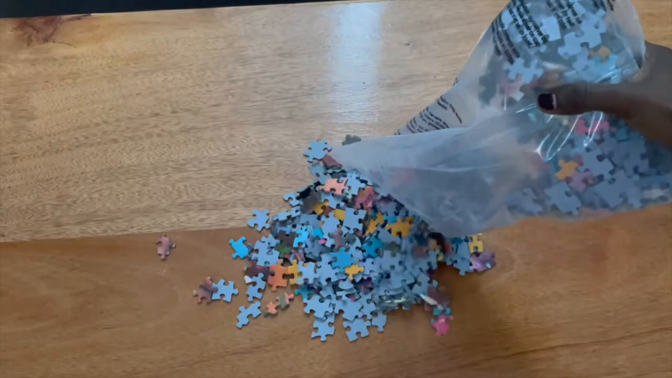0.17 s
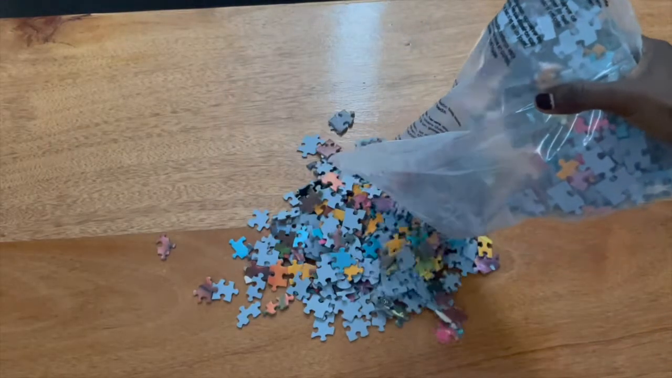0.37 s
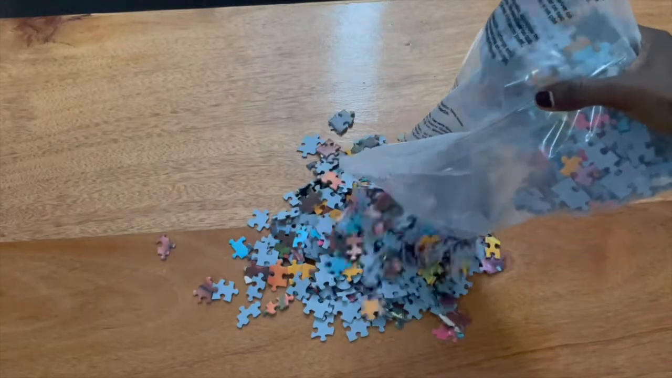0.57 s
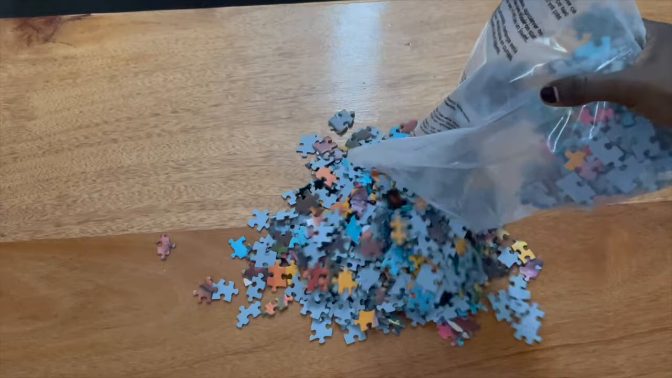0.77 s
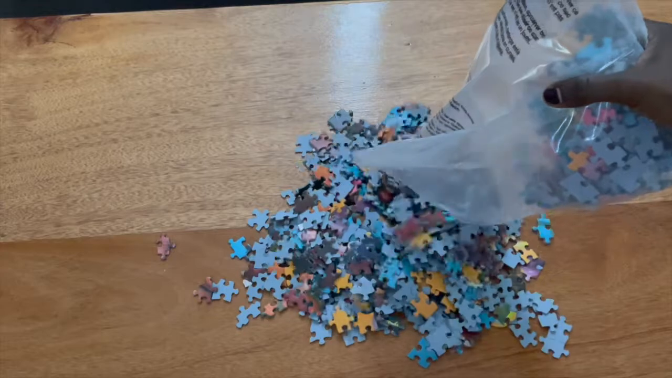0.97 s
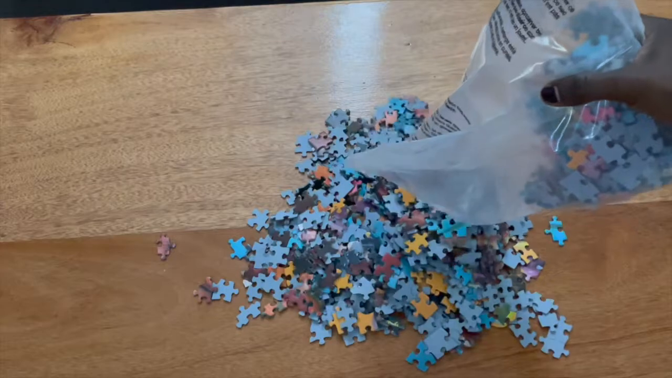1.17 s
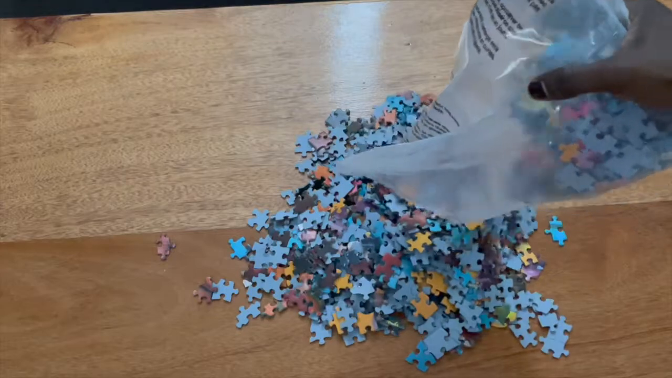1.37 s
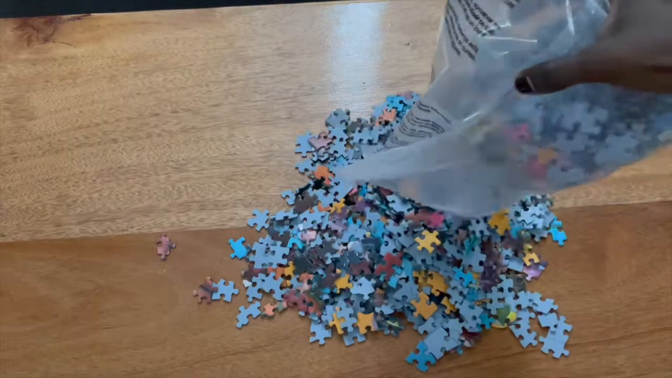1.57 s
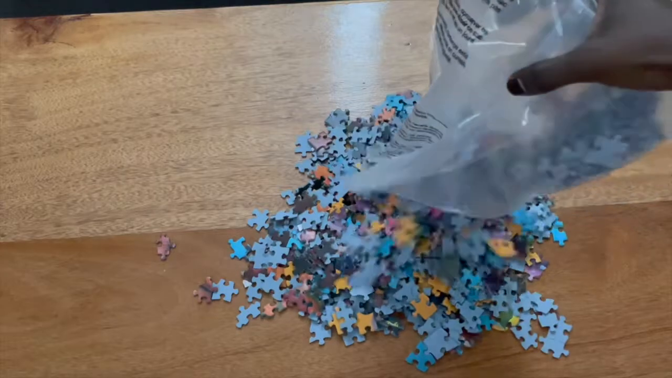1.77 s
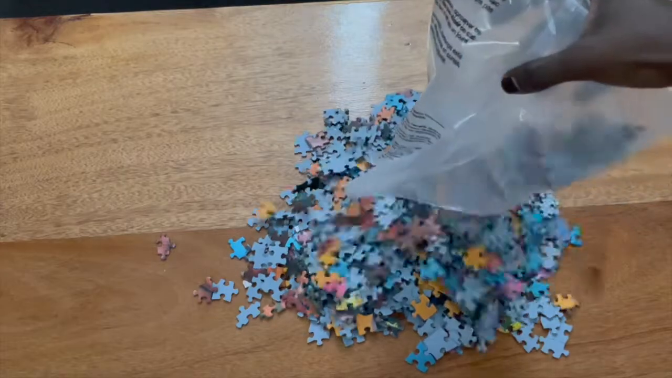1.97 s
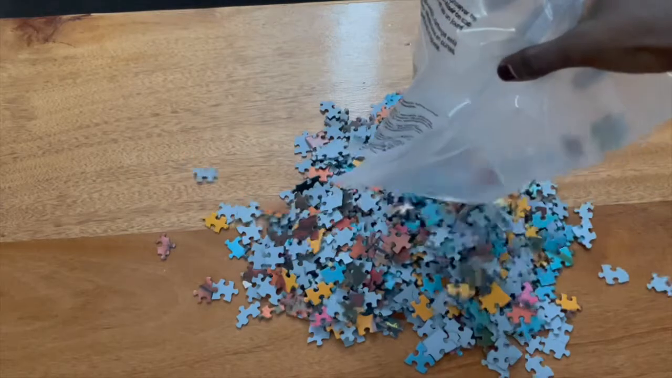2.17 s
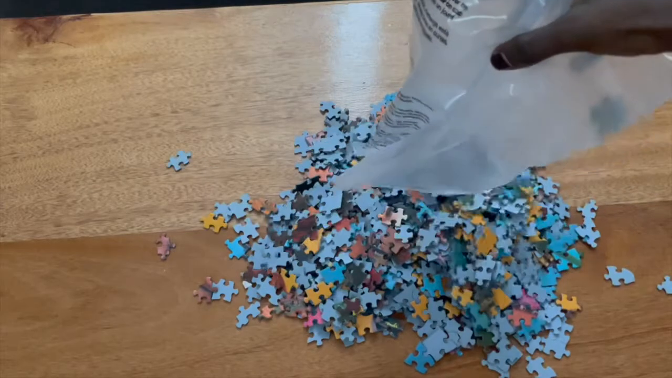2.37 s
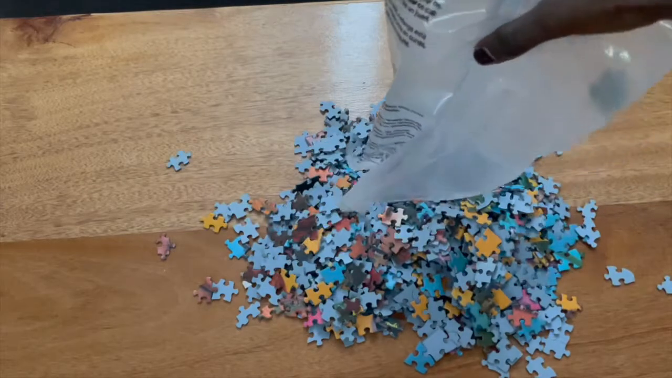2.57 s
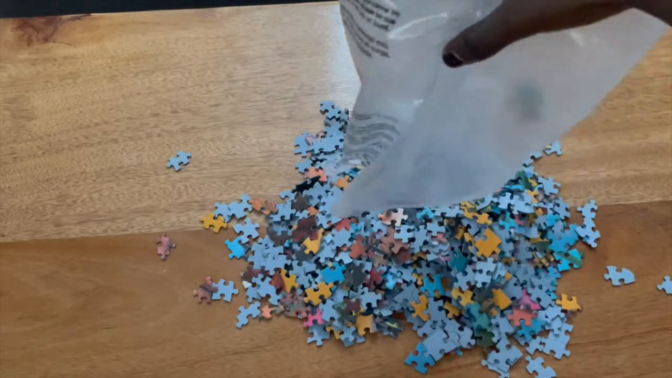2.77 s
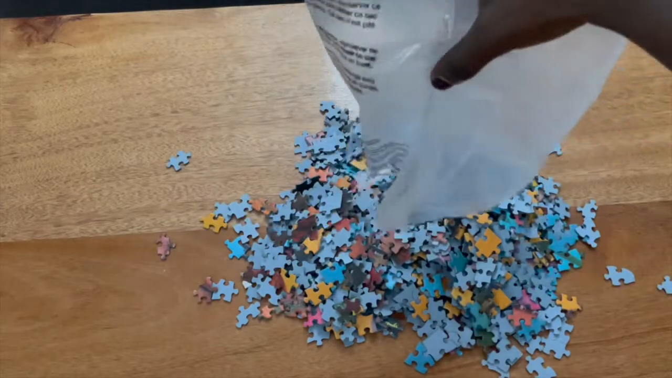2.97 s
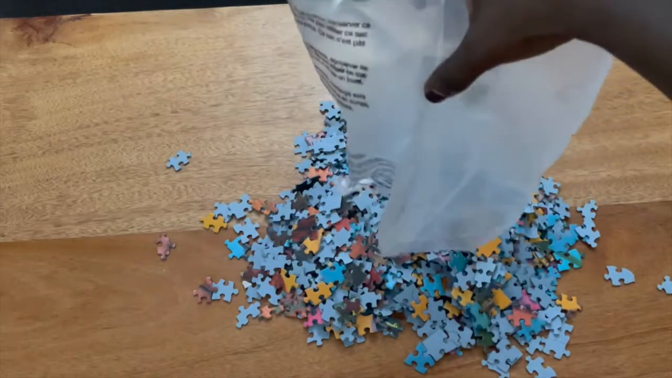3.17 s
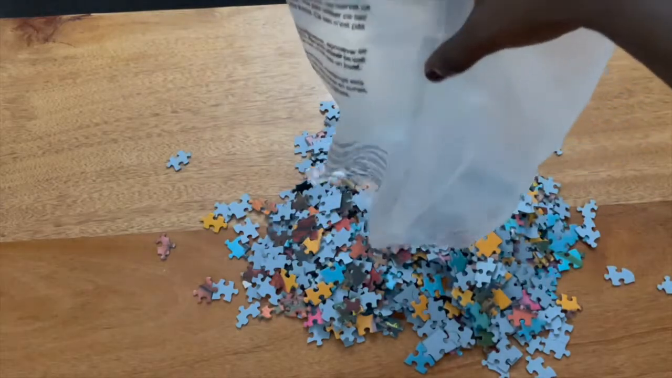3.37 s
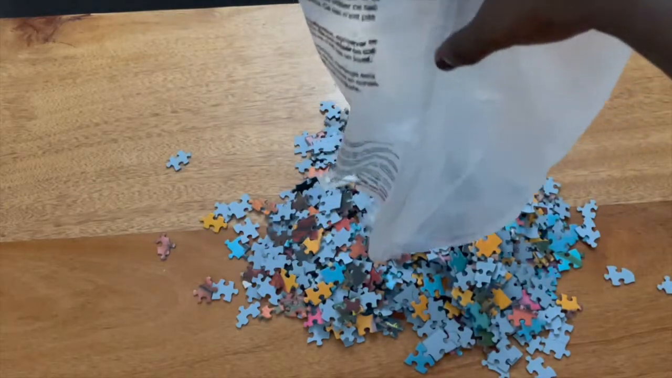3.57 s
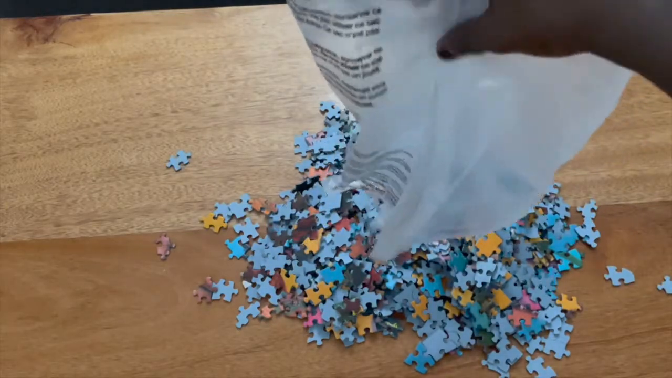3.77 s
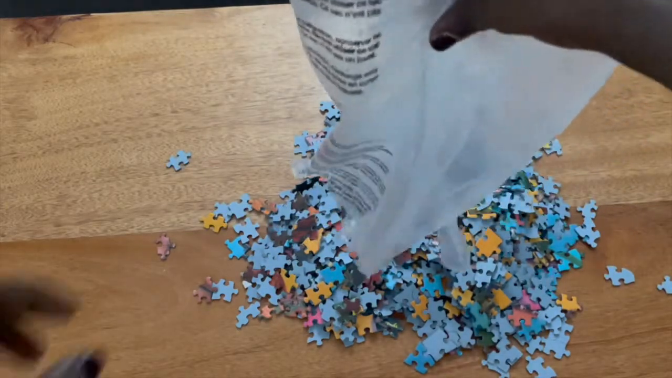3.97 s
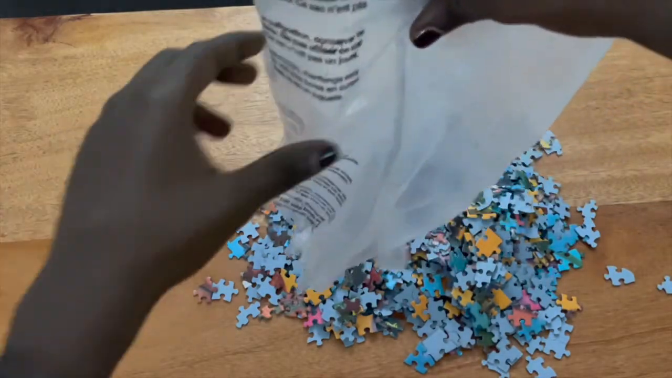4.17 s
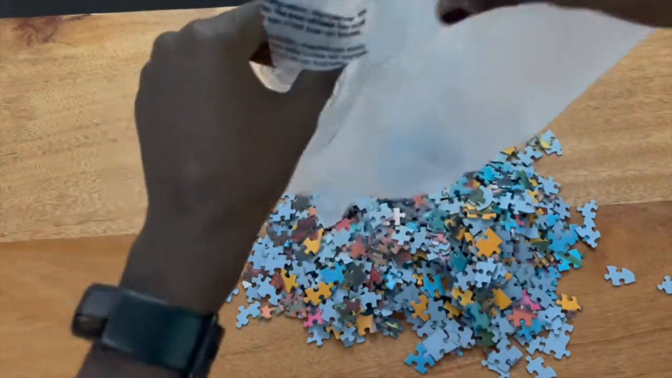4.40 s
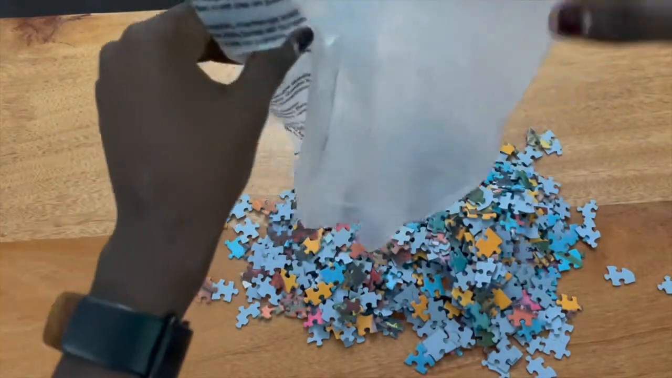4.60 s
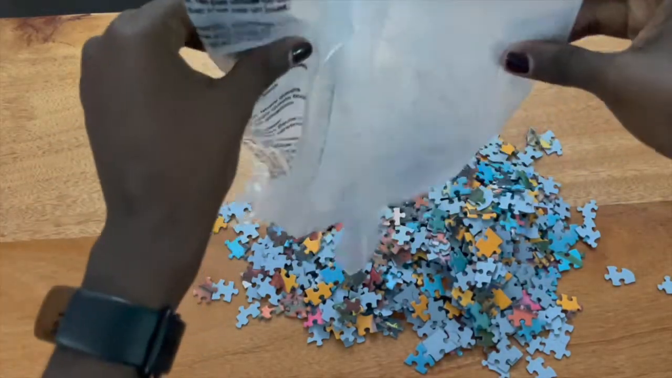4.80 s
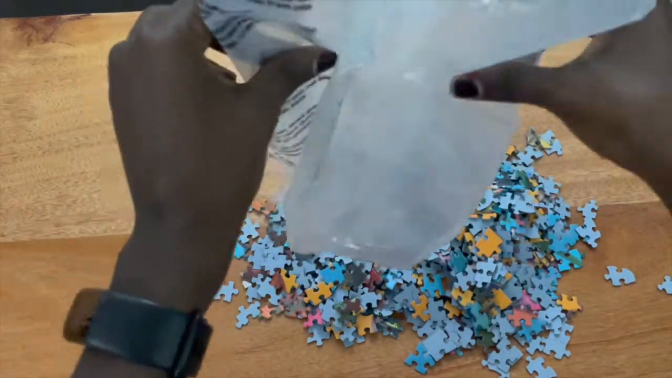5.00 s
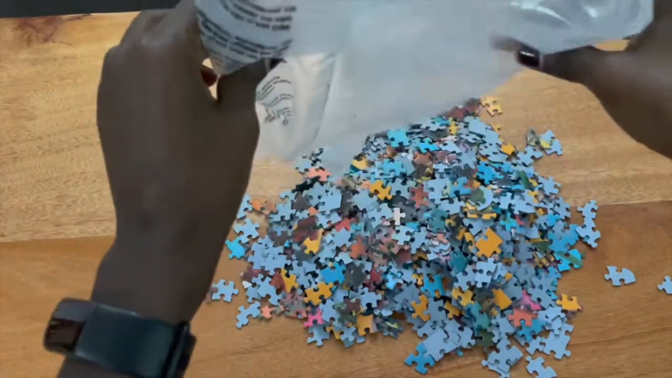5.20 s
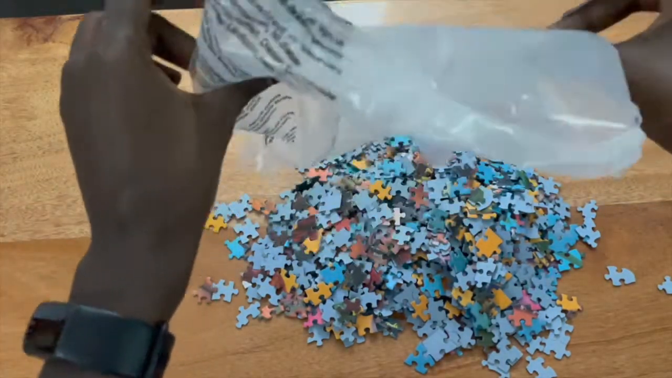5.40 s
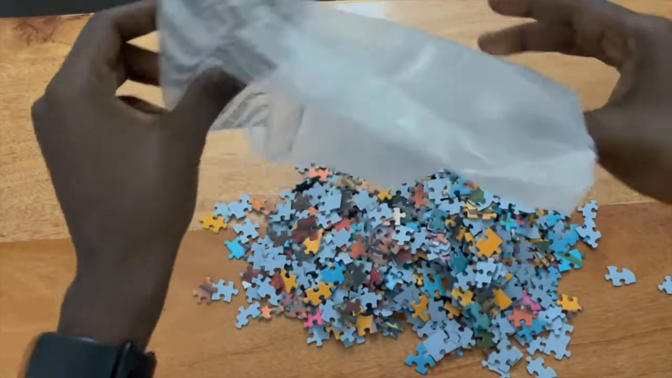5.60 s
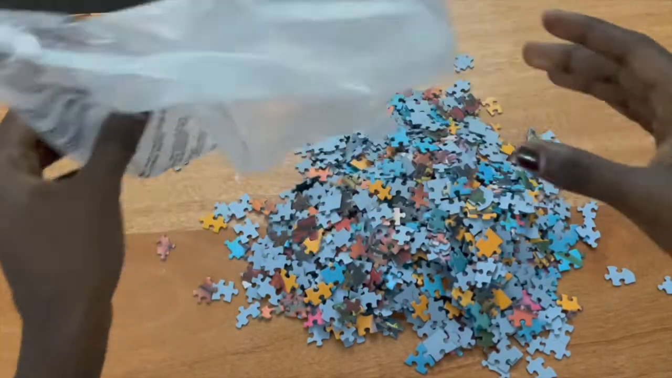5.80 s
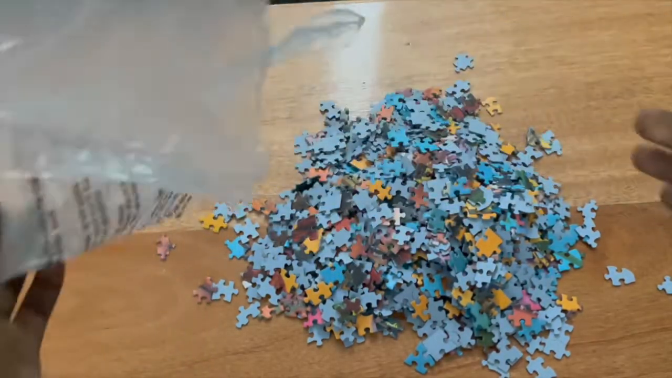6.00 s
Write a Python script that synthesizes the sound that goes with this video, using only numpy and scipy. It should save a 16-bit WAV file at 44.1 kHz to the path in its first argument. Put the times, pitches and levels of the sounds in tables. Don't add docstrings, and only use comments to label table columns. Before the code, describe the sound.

Cardboard puzzle pieces rush from a plastic bag in two clattering waves onto a wooden table, then the empty bag crinkles and snaps.

```python
import sys
import numpy as np
from scipy import signal
from scipy.fft import rfft, irfft, next_fast_len
from scipy.io import wavfile
from scipy.ndimage import uniform_filter1d, minimum_filter1d

SR = 44100
rng = np.random.default_rng(int(sys.argv[2]) if len(sys.argv) > 2 else 0)


def to_linear_factor(level_db):
    exponent = np.asarray(level_db, float) / 20
    return 10 ** exponent


def generate_wav(sig):
    pcm = np.round(np.clip(np.atleast_2d(sig).T, -1, 1) * 32767).astype(np.int16)
    wavfile.write(sys.argv[1], SR, pcm)


N = 266793
TIME = np.arange(N) / SR


def rms_one(x):
    return x / np.sqrt(np.mean(x ** 2) + 1e-20)


def at_hz(points, hz):
    f, level = np.transpose(points)
    return np.interp(np.log(np.maximum(hz, 1)), np.log(f), level)


def drift(rate):
    r = np.exp(-80 * np.pi * rate / SR)
    noise = rng.standard_normal(N // 40 + 2002)
    slow = signal.lfilter([1], [1, -2 * r, r * r], noise)[2000:]
    return np.interp(np.arange(N) / 40, np.arange(len(slow)), rms_one(slow))


def resonance(x, hz, width_hz):
    r = np.exp(-np.pi * width_hz / SR)
    zeros = np.array([1, 0, -1]) * (1 - r * r) / 2
    poles = [1, -2 * r * np.cos(2 * np.pi * hz / SR), r * r]
    return signal.lfilter(zeros, poles, x + 1e-18)


def band(x, low_hz, high_hz):
    return signal.sosfilt(signal.butter(2, [low_hz, high_hz], "band", fs=SR, output="sos"), x)


def pouring():
    # t/s, level/dB, weight reaching the bare wood/dB
    first_rush = [
        (0.0, -37.5, -0.5),
        (0.18, -43, 1),
        (0.4, -39, 1),
        (0.6, -32.5, 1.5),
        (0.74, -35, 3.5),
        (0.86, -30, -0.5),
        (1.04, -38.5, -1.5),
        (1.12, -45, 0),
        (1.23, -51.5, 0),
    ]
    second_rush = [
        (1.36, -43, 2.5),
        (1.61, -32.5, 1),
        (1.66, -27.5, -0.5),
        (1.95, -30.5, -1.5),
        (2.2, -33.5, -3),
        (2.42, -48.5, -1.5),
        (2.8, -52, 2.5),
        (3.4, -50.5, 4),
        (3.66, -67.5, 3.5),
    ]
    t, flow_db, weight_db = np.transpose(first_rush + second_rush)
    return np.interp(TIME, t, flow_db), np.interp(TIME, t, weight_db)


def movement():
    # peak t/s, rustle level/dB, hold/s, taut film's hiss re rustle/dB
    grips = [(3.786, -41, 0.1, -31.5), (4.196, -49, 0.021, 2), (4.306, -34, 0.0065, -30),
             (4.416, -49.5, 0.062, -5), (4.46, -52, 0.022, 0), (4.68, -54, .02, 9),
             (4.746, -36, 0.12, -6.5), (4.863, -34.5, 0.035, -10.5), (5.029, -32.5, 0.077, -1),
             (5.29, -33, 0.11, -7.5), (5.445, -43, 0.042, -12), (5.573, -44, 0.03, -29),
             (5.74, -54.5, 0.044, -26), (5.913, -64, 0.068, -24)]
    rise_db_per_s, fall_db_per_s = 208, 111
    flow_db, weight_db = pouring()
    rustle = to_linear_factor(2 * flow_db)
    hiss = to_linear_factor(2 * (-38 + 1.66 * (flow_db + 36)))
    for s, level_db, hold_s, taut_db in grips:
        rise = rise_db_per_s * np.maximum(s - TIME, 0)
        fall = fall_db_per_s * np.maximum(TIME - s - hold_s, 0)
        power = to_linear_factor(2 * (level_db - rise - fall))
        rustle = rustle + power
        hiss = hiss + power * to_linear_factor(2 * taut_db)
    return 10 * np.log10(rustle), 10 * np.log10(hiss), weight_db


def rumble():
    # f/Hz, width/Hz, level/dB
    modes = [(44.4, 34, -4), (69.2, 10.2, 4.5), (104.4, 43, -2.5)]
    rest_db, stirred_db = -42, -47
    white = rng.standard_normal(N + SR)
    low = 0
    for k, (hz, width_hz, db) in enumerate(modes):
        low = low + to_linear_factor(db) * rms_one(resonance(white, hz, width_hz)) * (-1) ** k
    low = band(low, 30, 160)[SR:]
    stirred = to_linear_factor(stirred_db + movement()[0] + 30)
    return (to_linear_factor(rest_db) + stirred) * rms_one(low)


def still_air():
    return to_linear_factor(-87.5) * band(rng.standard_normal(N), 200, 5400)


def thump():
    # t/s, f/Hz, peak level/dB, T60/s
    blows = [
        (2.93, 100.6, -37, 1),
        (3.098, 47, -36, 0.77),
        (4.735, 86, -22.5, 0.22),
    ]
    out = np.zeros(N)
    for s, hz, peak_db, t60 in blows:
        t = np.maximum(TIME - s, 0)
        out += to_linear_factor(peak_db - 60 * t / t60) * np.minimum(t / 0.0083, 1) * np.sin(2 * np.pi * hz * t)
    return out


def squeak():
    start, end, hz, width_hz = 3.545, 3.66, 3870, 150
    shape = np.interp(TIME, [start, start + .004, start + .02, end], [0, 1, .3, .15], right=0)
    whistle = resonance(resonance(rng.standard_normal(N), hz, width_hz), hz, width_hz)
    return to_linear_factor(-57) * shape * rms_one(whistle)


def foil():
    start, end, low_hz, high_hz = 2.68, 2.9, 8000, 11200
    ticks = rng.standard_normal(N) * (rng.random(N) < 500 / SR)
    shape = np.interp(TIME, [start, start + .005, end], [0, 1, .3], right=0)
    return to_linear_factor(-48) * shape * rms_one(band(band(ticks, low_hz, high_hz), low_hz, high_hz))


def crumples():
    # middle t/s, rms level/dB, f/Hz, half length/ms
    swells = [(0.737, -28, 2320, 42), (0.787, -22.5, 10000, 3.7), (1.702, -28, 3950, 26),
              (2.564, -67, 1500, 16), (2.94, -34, 3000, 1.8), (3.673, -19, 1790, 0.24),
              (4.792, -23.5, 3980, 2.4), (4.839, -23, 2480, 6.9), (4.929, -16.5, 4400, 1.8),
              (4.951, -23, 6000, 2.3), (4.959, -24.5, 1480, 5.1), (5.163, -28, 2000, 14),
              (5.335, -21.5, 2700, 8.7), (5.355, -20, 3500, 1.8), (5.382, -22.5, 3020, 1.4),
              (5.905, -49.5, 5950, 1.8), (1.158, -36.5, 6900, 1.3), (3.675, -32, 800, 1.8)]
    out, t = np.zeros(N), np.arange(-2048, 2048) / SR
    slips = rng.standard_normal((len(swells), 4096)) ** 3
    for (s, level_db, hz, ms), slip in zip(swells, slips):
        coloured = rms_one(resonance(slip, hz, hz / 0.59)) + 0.32 * rms_one(band(slip, 500, 5700))
        at = round(s * SR)
        out[at - 2048:at + 2048] += to_linear_factor(level_db) * coloured * np.exp(-(1000 * t / ms) ** 2)
    return out


def snaps():
    # t/s, peak level/dB, ring f/Hz, burst length/ms
    dull_landings = [(0.288, -41, 726, 2.4), (0.716, -13, 3720, 5.6), (1.025, -18.5, 1140, 4.7),
                     (0.665, -46, 1270, 4.6), (1.418, -27, 824, 3.5), (1.741, -11.5, 1300, 4),
                     (1.888, -5, 4370, 0.94), (1.967, -12, 6000, 1.5), (1.988, -14.5, 3730, 5.6),
                     (2.169, -15, 3330, 4.3), (2.269, -7, 4970, 1.4), (2.302, -12.5, 3970, 1.4)]
    last_pieces = [(2.41, -30.5, 1240, 3.2), (2.442, -25, 3780, 3.8), (2.491, -29.5, 960, 2.7),
                   (2.534, -32, 2030, 2.4), (2.57, -24.5, 1140, 3.9), (2.616, -31.5, 1870, 4.3),
                   (2.634, -39, 2500, 3), (2.952, -15, 2100, 1.1), (3.007, -30, 760, 2.6),
                   (3.055, -33, 1150, 4.6), (3.066, -27.5, 705, 2.8), (3.109, -18, 1130, 3.1),
                   (3.139, -31, 820, 2.1), (3.206, -17.5, 1240, 4.5), (3.433, -21.5, 1083, 2.1)]
    thick_folds = [(3.67, -12, 790, 1.6), (3.749, -27, 1050, 2.4), (3.78, -7.5, 2200, 1.9),
                   (3.804, -0.5, 3800, 1.4), (3.903, -24.5, 3470, 2.3), (4.138, -33.5, 1060, 2.9),
                   (4.279, -17, 2130, 1.9), (4.408, -10.5, 4970, 2), (4.693, -14, 1060, 5),
                   (4.835, -11.5, 1050, 4.7), (4.975, -5, 4350, 1.6), (5.231, -20, 1130, 4.8),
                   (5.277, -24, 1950, 2.6), (5.294, -12.5, 3840, 2.4), (5.335, -13.5, 860, 5.3),
                   (5.387, -3.5, 3240, 2.7), (5.414, -9.5, 4550, 1.8), (5.714, -19, 1830, 1.95)]
    emptying_snaps = [(0.308, -23.5, 900, 10), (0.349, -35, 3010, 2.3), (0.834, -11.5, 3800, 6.2),
                      (1.005, -17, 5640, 2), (1.341, -25, 1990, 1.9), (1.468, -19, 1100, 5.2),
                      (1.514, -14, 4460, 4.1), (1.575, -19, 1170, 0.65), (1.629, -18, 1470, 5.7),
                      (1.65, -3, 7540, 1.3), (0.375, -39, 5500, 1.3), (0.902, -14.5, 5000, 3.5),
                      (1.058, -23, 4400, 1.3), (2.057, -11, 5500, 2), (2.07, -9, 8500, 1.4),
                      (2.325, -20, 5500, 2.7), (2.365, -13, 3880, 1.77), (2.683, -27, 2200, 2.5),
                      (2.752, -31.5, 1170, 7.1), (2.985, -18.5, 3900, 3.6), (3.249, -18.5, 3860, 2.6),
                      (3.312, -23.5, 980, 4.4), (3.33, -18, 3680, 5), (3.379, -29, 1310, 5.1)]
    hand_snaps = [(4.162, -29, 1130, 11), (4.179, -19, 1270, 2.6), (4.224, -7.5, 2000, 2.8),
                  (3.739, -30, 5800, 1.3), (4.292, -11.5, 8800, 2.7), (4.562, -26, 5000, 1.2),
                  (4.664, -30, 1600, 4.8), (4.736, -5.5, 2490, 3.3), (4.796, -6.5, 5870, 1.3),
                  (4.811, -6, 1630, 4.4), (4.93, -12.5, 2100, 3.7), (4.934, 1.5, 5230, 1.8),
                  (5.055, -15, 3770, 2.2), (5.364, -13, 1700, 3.9), (5.583, -17, 2930, 3.6),
                  (5.959, -41.5, 810, 3.6)]
    soft_slaps = [(0.419, -23, 1290, 3.1), (1.241, -29.5, 1340, 3.9), (2.552, -24.5, 1510, 8.4),
                  (2.774, -30.5, 493, 4.5), (2.901, -34, 996, 4.4), (2.926, -28, 890, 4.2),
                  (3.485, -37, 1050, 7.2), (3.69, -29, 196, 23), (3.766, -24.5, 1500, 9.4),
                  (3.855, -28, 716, 7.7), (4.308, -6.5, 3340, 2.95), (4.311, -24.5, 201, 12.6),
                  (5.159, -18, 1550, 8.8), (5.498, -21.5, 1760, 2.7), (5.527, -25, 1390, 2.1),
                  (5.659, -32, 900, 4.8)]
    kinds = [dull_landings, last_pieces, thick_folds, emptying_snaps, hand_snaps, soft_slaps]
    # low push level/dB, bright edge level/dB
    kind_edges = [
        (-21.5, -31),
        (-15, -40),
        (-20, -20.5),
        (-21.5, 3),
        (-14, -3),
        (-7, -35),
    ]
    push_loss = 0.17
    spike = 0.75
    rows = [row + edge for kind, edge in zip(kinds, kind_edges) for row in kind]
    slips = rng.standard_normal((len(rows), 2048))
    slips = slips * np.abs(slips)
    heard, radiated = np.zeros((2, N + 2048))
    t = np.arange(2048) / SR
    for (s, peak_db, hz, ms, low_db, bright_db), slip in zip(rows, slips):
        low_db = low_db - push_loss * (peak_db + 22.5)
        length = np.clip(ms, .3, 12) / 1000
        burst = slip * np.minimum(t / (0.52 * length), 1) * np.exp(-t / length)
        burst[round(.52 * length * SR)] += spike * np.abs(burst).max()
        parts = [resonance(burst, hz, hz / 4), band(burst, hz / 3.4, min(2.8 * hz, 7800)),
                 band(burst, 296, 1800), band(burst, 3900, 13500)]
        ring, crack, low, bright = [p / np.abs(p).max() for p in parts]
        total = ring + 1.104 * crack + to_linear_factor(low_db + 9) * low + to_linear_factor(bright_db - 0.5) * bright
        at = round(s * SR)
        heard[at:at + 2048] += to_linear_factor(peak_db - 7) * total
        broad = band(burst, 520, 5600)
        radiated[at:at + 2048] += to_linear_factor(peak_db) * broad / np.abs(broad).max()
    return heard[:N], radiated[:N]


def contacts(rows, level_db, cycles, table_db):
    # f/Hz, level/dB, T60/s
    table_modes = [(1170, -8, 0.025), (3750, -5, 0.023), (5070, -5.5, 0.016)]
    out, t = np.zeros(N + 2048), np.arange(2048) / SR
    table_ring = sum(to_linear_factor(db + table_db - 60 * t / t60) * np.sin(2 * np.pi * hz * t) for hz, db, t60 in table_modes)
    click = 0.96 * np.exp(-t / .0004) * np.cos(2 * np.pi * 6500 * t)
    onset = np.minimum(t / 0.0009, 1)
    for s, peak_db, hz in rows:
        own = to_linear_factor(-60 * t * hz / cycles) * np.sin(2 * np.pi * hz * t)
        out[round(s * SR):][:2048] += to_linear_factor(peak_db + level_db) * onset * (own + table_ring + click)
    return out[:N]


def glints():
    # t/s, peak level/dB, ring f/Hz
    film_glints = [(0.0844, -36, 10600), (0.0922, -22, 10000), (0.1074, -34, 10600), (0.2244, -38, 9110),
                   (0.3082, -32, 10600), (0.3805, -32, 9140), (0.5516, -30, 10400), (0.6265, -26, 9370),
                   (0.6644, -30, 10200), (0.6794, -32, 8450), (1.5733, -24, 9510), (1.7724, -19, 9870),
                   (1.8033, -20, 9420), (1.9684, -18, 9730), (1.9889, -17, 11400), (2.0094, -18, 9220),
                   (2.1494, -24, 10300), (2.171, -25, 9450), (2.1894, -27, 10800), (3.2044, -45, 11000),
                   (4.9494, -17, 10300), (4.9746, -23, 9670), (5.0549, -13, 8900), (5.3363, -20, 9390),
                   (5.4126, -30, 10200)]
    return contacts(film_glints, -1, cycles=40, table_db=-20)


def flicks():
    # t/s, peak level/dB, ring f/Hz
    crease_flicks = [(2.424, -31, 3770), (2.477, -33, 2050), (2.563, -22, 1110), (2.704, -38, 2920),
                     (2.734, -36, 1020), (2.764, -28, 756), (2.789, -36, 1170), (2.819, -36, 1010),
                     (2.864, -40, 1010), (2.937, -21, 1720), (3.021, -36, 789), (3.044, -30, 1090),
                     (3.084, -29, 1530), (3.156, -36, 703), (3.184, -23.5, 1190), (3.224, -37, 1000),
                     (3.342, -22, 3900), (3.401, -32, 848), (3.529, -30, 3850), (3.814, -19, 915),
                     (3.824, -26.5, 2620), (3.911, -31, 1020), (4.244, -32, 2920), (4.329, -26, 937),
                     (4.359, -22, 1950), (4.466, -28, 3420), (4.499, -33, 1160), (4.701, -17.5, 890),
                     (4.714, -16, 1210), (4.744, -16, 3370), (4.827, -12, 2020), (4.849, -18, 1760),
                     (4.859, -13, 1910), (4.876, -18, 1110), (4.944, -13, 2320), (4.989, -21, 947),
                     (5.021, -24, 3650), (5.044, -21, 1110), (5.07, -22, 1230), (5.089, -16.5, 840),
                     (5.109, -21, 5190), (5.16, -19, 1780), (5.171, -18, 820), (5.259, -17, 3160),
                     (5.324, -12, 1190), (5.344, -14, 3950), (5.429, -22.5, 3750), (5.444, -26, 1120),
                     (5.463, -24, 837), (5.554, -31, 853), (5.6, -19, 2870), (5.619, -35, 2890),
                     (5.679, -34, 2270), (5.744, -37, 1210), (5.809, -45, 1230), (5.904, -33, 3080)]
    return contacts(crease_flicks, -4.5, cycles=19.4, table_db=-7)


def clacks():
    # t/s, peak level/dB, ring f/Hz
    piece_clacks = [(0.108, -26, 1200), (0.144, -21, 3000), (0.242, -30, 1140), (0.26, -34, 914),
                    (0.399, -22, 1350), (0.455, -18, 1380), (0.494, -15, 1660), (0.532, -17.5, 1320),
                    (0.549, -21, 1280), (0.599, -15, 2900), (0.63, -23, 3040), (0.665, -23, 1290),
                    (0.73, -14, 1290), (0.744, -17, 2430), (0.771, -16, 3570), (0.798, -18, 923),
                    (0.844, -15, 1360), (0.859, -17, 4770), (0.887, -20, 1310), (0.929, -18, 3860),
                    (0.944, -16, 3880), (1.044, -25, 1780), (1.378, -27, 1150), (1.398, -30, 700),
                    (1.545, -17, 1540), (1.557, -20, 3820), (1.583, -19.5, 1120), (1.654, -13, 940),
                    (1.664, -11, 4900), (1.679, -17, 1350), (1.699, -10, 4760), (1.72, -15, 1390),
                    (1.763, -13, 3470), (1.779, -14, 4380), (1.803, -14, 1280), (1.819, -19, 3930),
                    (1.844, -9, 4780), (1.867, -11, 3620), (1.909, -16, 1510), (1.936, -16, 1140),
                    (1.949, -15, 4100), (2.009, -17, 4710), (2.037, -13, 3960), (2.049, -16, 5440),
                    (2.092, -16, 3950), (2.119, -18.5, 1230), (2.139, -21, 4610), (2.189, -18, 3870),
                    (2.224, -34, 3810), (2.28, -23, 4340), (2.29, -17, 3710)]
    return contacts(piece_clacks, -4.5, cycles=26.4, table_db=-2)


def grains(per_s, colour, spread_db, clump_db, sharpness, count):
    sizes = to_linear_factor(spread_db * np.minimum(rng.exponential(1, N), 5)) * rng.choice([-1, 1], N)
    clump = to_linear_factor(clump_db * drift(35))
    clicks = sizes * clump * (rng.random(N) < per_s * clump / SR)
    dealt = rng.integers(0, count, (2, N))
    out = np.zeros(N)
    for k, hz in enumerate(np.geomspace(colour[0][0], colour[-1][0], count)):
        struck = clicks * (dealt == k).any(axis=0)
        out += to_linear_factor(at_hz(colour, hz)) * resonance(struck, hz, hz / sharpness)
    return out / np.sqrt(uniform_filter1d(out ** 2, SR // 16) + 1e-12)


def stream():
    # f/Hz, level/dB
    card_colour = [(500, -21), (900, 3), (1300, 2.5), (2600, 1), (3900, 2), (6000, -9.5), (8000, -20.5)]
    film_colour = [(6000, 16), (8000, 12.5), (10000, 4), (13500, -61), (15500, 8)]
    wood_colour = [(140, 4), (200, -1), (310, 4.5), (450, -16.5), (620, -3)]
    flat_colour = [(700, -6.5), (1250, 6.5), (2300, -3.5), (3850, 7.5), (5500, 3)]
    per_s = 2700
    clatter_db, film_db, weight_db = movement()
    flow_db, _ = pouring()

    clatter = to_linear_factor(clatter_db) * grains(per_s, card_colour, 0.5, 0.91, sharpness=4.5, count=16)
    film = to_linear_factor(film_db) * grains(4 * per_s, film_colour, 3.4, 2.2, sharpness=2.45, count=8)

    thud_level = to_linear_factor(-40.5 + 0.89 * (clatter_db + 35)) + to_linear_factor(-60.5)
    thud_level = thud_level * to_linear_factor(-0.13 * (TIME - 2.5))
    lifted = np.clip(4 * (TIME - 3.56), 0, 1)
    thud_level = thud_level * to_linear_factor(weight_db - 3.5 * lifted)
    thud = thud_level * grains(.4 * per_s, wood_colour, 2.24, 1.2, sharpness=2.76, count=7)

    knock_level = to_linear_factor(-40.5 + 1.03 * (flow_db + 35))
    knocks = knock_level * grains(.15 * per_s, flat_colour, 2.1, 1.7, sharpness=16.5, count=12)
    pieces = clatter + knocks
    body = (to_linear_factor(weight_db) - 1) * band(pieces, 400, 2600)
    return pieces + body + film + thud


def room(x):
    t60_s, wall_cut_hz = 0.16, 3100
    t = np.arange(SR // 2) / SR
    white = rng.standard_normal((3, len(t)))
    dull = signal.sosfilt(signal.butter(1, wall_cut_hz, fs=SR, output="sos"), white)
    tails = dull * to_linear_factor(-60 * t / t60_s) + (white - dull) * to_linear_factor(-60 * t / (0.49 * t60_s))
    tails = tails * np.minimum(t / 0.0084, 1)
    tails = tails / np.sqrt(np.sum(tails ** 2, axis=1, keepdims=True))
    place = np.cos(2 * drift(12) + np.arange(3)[:, None] * 2 * np.pi / 3) / np.sqrt(1.5)
    return signal.fftconvolve(x * place, tails, axes=1)[:, :N].sum(axis=0)


def ports(x):
    lead = [(0, 0), (700, -.4), (1800, 0), (2600, .8), (4400, .85), (5200, .2), (7500, 3.1), (15900, 11.3)]
    unlike = [(100, -50), (300, -16), (700, -10), (1200, -13), (2200, -18), (4000, -14), (9000, -10),
              (13000, -6)]
    tilt = [(60, 0), (200, .5), (380, 2.5), (700, .5), (2400, 0)]
    size = next_fast_len(N + SR)
    hz = np.arange(size // 2 + 1) * SR / size
    scatter = rng.standard_normal(4096) * np.exp(-np.arange(4096) / SR / 0.044)
    scatter = rfft(scatter / np.sqrt(np.sum(scatter ** 2)), size) * to_linear_factor(at_hz(unlike, hz))
    sign = np.array([[1], [-1]])
    phase = np.exp(.5j * sign * np.interp(hz, *np.transpose(lead)))
    shift = phase * to_linear_factor(sign * at_hz(tilt, hz) / 2)
    own = rfft(x * np.cos(3 * drift(8)) * np.sqrt(2), size) * scatter
    return irfft((rfft(x, size) + sign * own) * shift, size)[:, :N]


def scene():
    steady = stream() + squeak() + foil()
    heard, radiated = snaps()
    sudden = heard + crumples() + clacks() + flicks() + glints()
    reflected = room(to_linear_factor(-8.5) * steady + to_linear_factor(-10.5) * (sudden + radiated) / 2)
    return ports(steady + sudden + reflected + rumble() + thump() + still_air())


def attacks(x):
    attack_db, keep_s = 7.3, .018
    power = uniform_filter1d(band(x, 4500, 13000) ** 2, 128) + 1e-14
    sharp = power > to_linear_factor(2 * attack_db) * uniform_filter1d(power, 4096)
    return -minimum_filter1d(-1. * sharp, round(keep_s * SR))


def drop_bands(x, bands, kept):
    hz, frames, spec = signal.stft(x, SR, "cosine", 2048, 1024)
    edges = 1 + .016 * np.round(rng.normal(0, .8, (len(bands), 2, len(frames))))
    inside = sum((hz[:, None] > low * a) & (hz[:, None] < high * b)
                 for (low, high), (a, b) in zip(bands, edges))
    weak = signal.istft(spec * inside, SR, "cosine", 2048, 1024)[1][:N]
    return x - (1 - uniform_filter1d(kept, 400)) * weak


def top_cut(x):
    return signal.sosfilt(signal.butter(12, 16400, fs=SR, output="sos"), x)


def record(dry):
    # low f/Hz, high f/Hz
    sum_dropped = [(6920, 8330), (13020, 15200)]
    difference_dropped = [(4700, 5550), (10000, 12200)]
    left, right = signal.sosfilt(signal.cheby2(16, 38, 15950, fs=SR, output="sos"), dry)
    kept = attacks(left)
    mid = drop_bands((left + right) / 2, sum_dropped, kept)
    side = drop_bands((left - right) / 2, difference_dropped, kept)
    return top_cut(np.clip([mid + side, mid - side], -1, 1))


dry = scene()
out = record(dry)
generate_wav(out)
```